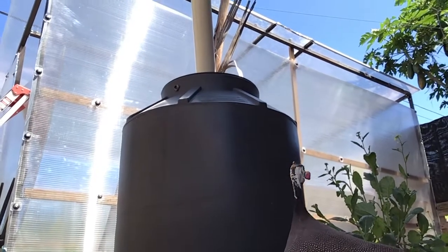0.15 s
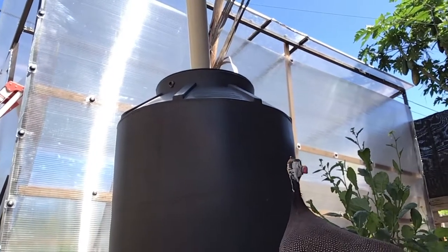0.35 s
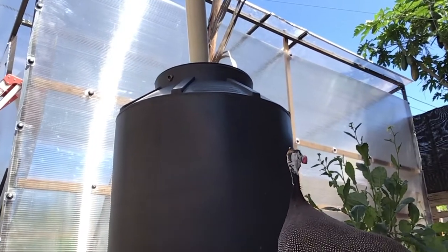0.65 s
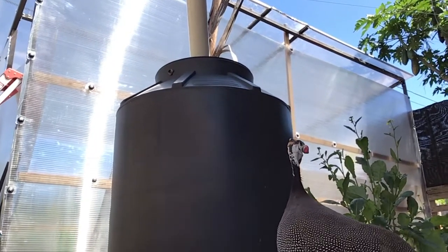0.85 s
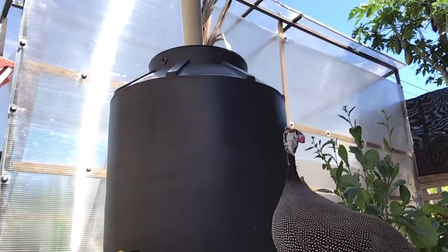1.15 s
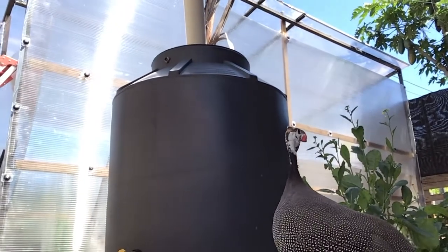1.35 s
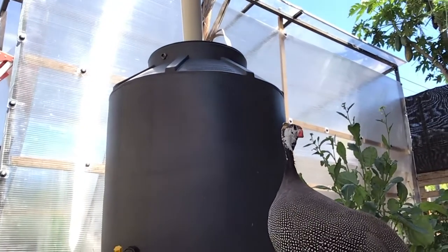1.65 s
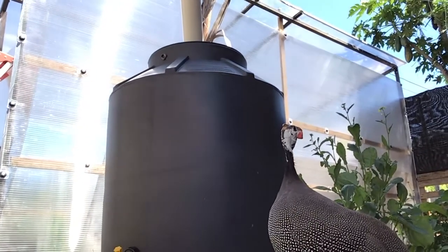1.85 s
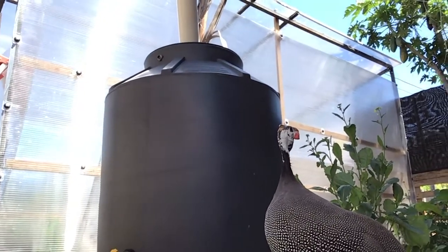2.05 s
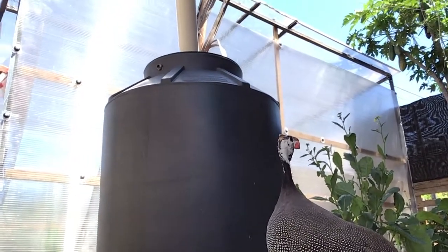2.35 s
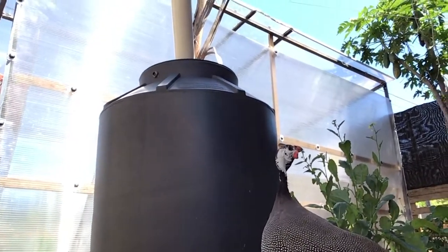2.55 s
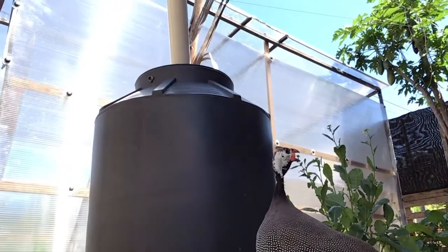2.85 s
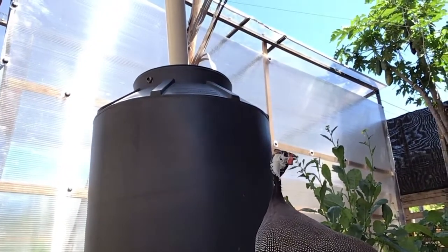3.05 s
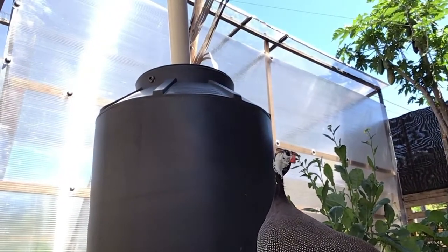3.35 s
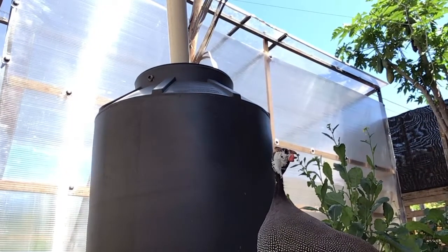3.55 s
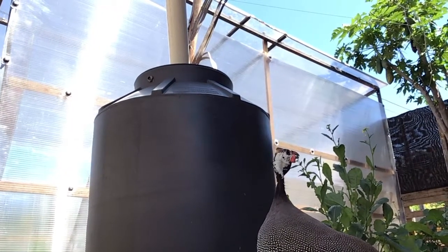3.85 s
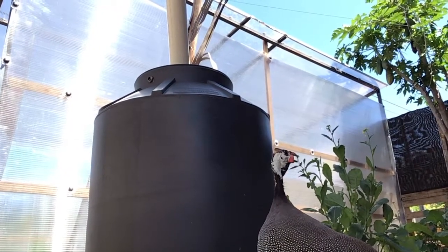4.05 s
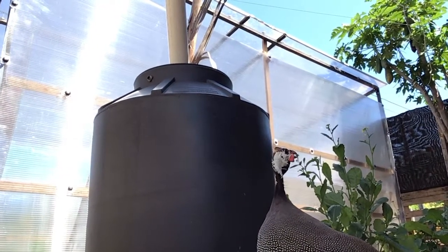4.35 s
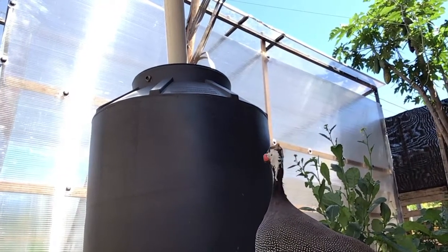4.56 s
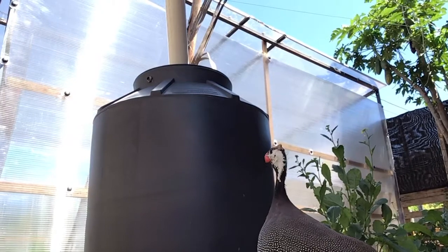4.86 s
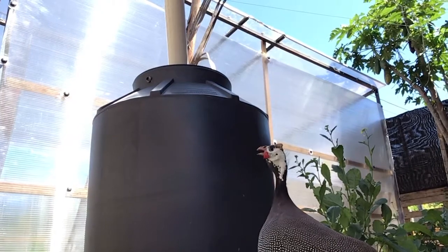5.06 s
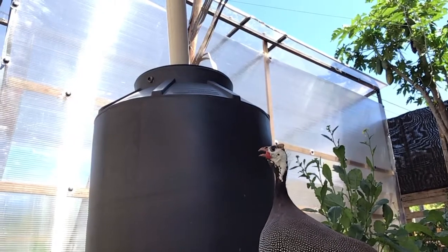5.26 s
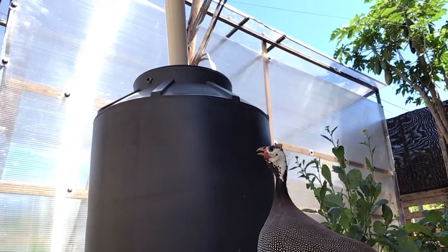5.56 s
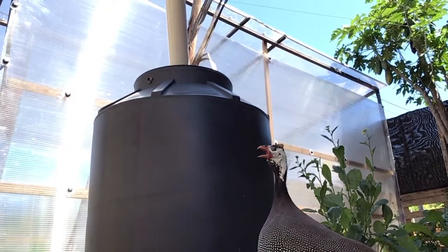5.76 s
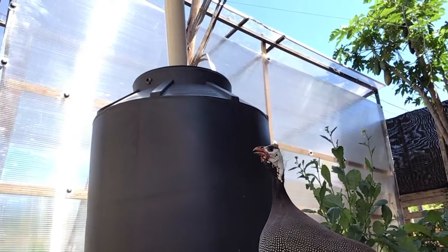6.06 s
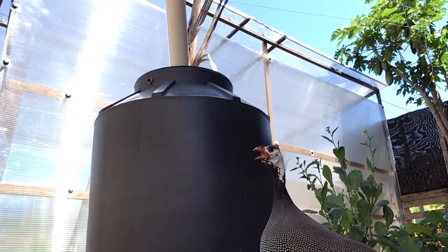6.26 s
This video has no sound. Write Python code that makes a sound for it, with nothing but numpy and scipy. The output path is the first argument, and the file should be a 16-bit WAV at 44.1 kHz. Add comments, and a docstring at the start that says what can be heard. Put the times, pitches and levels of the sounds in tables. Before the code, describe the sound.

Loud, raspy two-note guineafowl calls repeat steadily in a garden, with quieter distant replies and soft wind bumps.

```python
"""Guineafowl in a garden

A close guineafowl repeats a two-note call: a squeak, then a squawk that starts as a two-voiced whistle,
breaks into a rasp and settles into a reedy buzz (syrinx pulses ringing throat and beak). A second one
answers from farther off and one thin whistle slides down. Light wind bumps the microphone over steady
air, a faint distant hum and two dry ticks."""
import sys
import numpy as np
from scipy import signal
from scipy.fft import rfft, irfft, next_fast_len
from scipy.io import wavfile
from scipy.ndimage import uniform_filter1d

SR = 44100
rng = np.random.default_rng(int(sys.argv[2]) if len(sys.argv) > 2 else 0)


def wav_record(signal):
    """Record a signal, one row per channel, as 16-bit PCM in the file named by sys.argv[1]."""
    frames = np.transpose(np.atleast_2d(signal))
    bounded = np.clip(frames, -1, 1)
    # unit amplitude maps onto the largest positive 16-bit level
    quanta = np.round(bounded * 32767).astype(np.int16)
    wavfile.write(sys.argv[1], SR, quanta)


N = 283122
TIME_S = np.arange(N) / SR

# breeze, gust onsets, hum, ticks (time [s], level [dB])
BREEZE = [(0, -56), (1.4, -56), (1.9, -60), (2.8, -61.5), (3.3, -60), (6.4, -63)]
GUSTS = [(0.036, -41), (0.423, -45), (0.546, -33.5), (0.784, -34.5), (1.155, -43), (1.254, -36.5),
         (1.465, -35.5), (2.003, -42.5), (2.479, -43.5), (3.698, -49), (3.754, -49.5), (4.934, -52)]
HUM = [(0, -65), (.22, -55), (.45, -65.5), (1.7, -62), (2.3, -64.5), (2.6, -75.5), (6.4, -87)]
TICKS = [(.157, -69), (4.318, -58.5)]
# noise spectra (frequency [Hz], gain [dB])
WIND_SPECTRUM = [(15, -56.5), (25, -18.5), (54, 2.5), (134, 1), (277, -18.5), (357, -30), (448, -28.5),
                 (492, -43), (600, -30), (780, -66), (1320, -120)]
AIR_SPECTRUM = [(30, -16), (60, 4.5), (150, -2.5), (300, -2.5), (550, -16.5), (1500, -15.5), (3000, -23),
                (6000, -27.5), (15000, -35.5)]
TICK_SPECTRUM = [(3000, -27), (6500, 3), (10000, 0), (15000, -14)]
BEAK_HISS = [(9500, -24.5), (10600, -12.5), (11300, 0.5), (12100, 3.5), (12700, -17), (14500, -28)]
# far calls (high note start [s], high note level [dB], low note level [dB])
FAR_CALLS = [(-.11, -51, -70), (.43, -53.5, -58), (1.001, -56.5, -59), (1.536, -50, -59.5),
             (2.108, -52.5, -57.5), (2.649, -51.5, -60), (3.234, -52.5, -60), (3.809, -51, -60),
             (4.36, -52.5, -60.5), (4.92, -51.5, -59), (5.485, -52.5, -59.5), (6.01, -53, -60.5)]
# near squeaks (centre [s], half width [s], level [dB])
SQUEAKS = [(.256, 0.018, -39.5), (.85, 0.01404, -32), (1.475, 0.015, -29), (2.105, .016, -34),
           (2.71, .01, -34.5), (3.311, 0.0097, -30.5), (3.859, 0.011, -28.5), (4.409, 0.01531, -26.5),
           (4.995, .016, -31), (5.567, .019, -23.5), (6.129, .018, -21)]
# near squawks (start [s], whistle length [s], total length [s], pitch [Hz], whistle [dB], buzz [dB])
SQUAWKS = [(0.369, 0.042, 0.13, 1890, -21.5, -22), (.989, 0.023, .098, 1896, -15.5, -24.5),
           (1.623, .038, 0.091, 1888, -16, -25.5), (2.231, 0.046, 0.11, 1885, -18.5, -26),
           (2.829, 0.033, 0.12, 1881, -18, -28.5), (3.42, 0.039, 0.12, 1860, -17.5, -26.5),
           (3.959, .036, 0.12, 1886, -18.5, -26), (4.519, .05, .128, 1823, -19.5, -24),
           (5.112, 0.02, .119, 1872, -15, -22.5), (5.692, .032, 0.11, 1863, -15, -23),
           (6.229, .033, 0.13, 1848, -17, -23)]
# treble shading as the near bird turns its head (time [s], gain [dB])
FACING = [(.4, -2.5), (1.1, -5.5), (1.7, -7), (2.3, -6.5), (4.1, -6), (4.6, -1), (5.05, 2), (5.8, 1.5),
          (6.3, 2.5)]
# throat and open-beak resonances (frequency [Hz], gain [dB])
FAR_THROAT = [(600, -39.5), (900, -15.5), (1140, -3.5), (1350, -7), (1850, 7), (2300, -1.5), (3000, -5.5),
              (4000, -12.5), (5000, -11), (6200, -19), (8000, -24.5), (12000, -28.5), (15500, -36.5)]
RASP_THROAT = [(250, -39), (420, -30.5), (580, -33.5), (820, -30), (950, -24.5), (1170, -9), (1370, -12),
               (1650, -8.5), (1780, -5), (1910, 1), (2150, -15.5), (2370, -15.5), (3200, -27.5),
               (4500, -48.5)]
BUZZ_THROAT = [(250, -37.5), (390, -17.5), (560, -62.5), (780, -21), (930, -28.5), (1160, -12), (1520, -20),
               (1700, 5), (1930, 1.5), (2130, -10), (2340, -11), (2600, -15), (3200, -26), (4500, -66)]
RASP_BEAK = [(2000, -38), (3300, -10), (4400, -18.5), (4900, 5.5), (5500, -0.5), (6300, -7.5),
             (7200, -22.5), (9900, -27), (11400, -14.5), (12600, -22), (15500, -33.5)]
BUZZ_BEAK = [(2000, -50), (3400, -8.5), (4250, -0.5), (4600, -3), (5050, -5), (5900, -23), (7200, -18.5),
             (9900, -27.5), (11200, -17), (12600, -27.5), (15500, -30.5)]
# harmonics (multiple of pitch, gain [dB])
FAR_PARTIALS = [(1, -5.5), (2, -2), (3, -8.5), (4, -25), (5, -21), (6, -21.5), (7, -30)]
PEEP_PARTIALS = [(1, -6), (2, -2.5), (4, -13), (6, -27)]
WHISTLE_OVERTONES = [(2, -11), (3, -3), (4, -22.5), (5, -25), (6, -17.5), (7, -29.5)]
SLIDE_PARTIALS = [(1, -8.5), (2, -7.5), (3, 5.5)]
# second voice at 3/5 of the whistle's pitch, and combination tones (multiple of pitch/5, gain [dB])
TWO_VOICES = [(3, -18), (4, -32), (7, -27.5), (8, -34)]
TWO_VOICES_TREBLE = [(12, -35), (13, -30), (14, -28), (16, -31.5), (17, -37)]
# squeak envelope (offset from centre [half widths], gain [dB])
SQUEAK_SWELL = [(-2.4, -36), (-1.1, -15), (-.45, -2.5), (0, 0), (.45, -2.5), (1.1, -17), (2.4, -45)]
# onset envelopes (time from squawk start [s], gain [dB])
CREAK_SWELL = [(-.034, -30), (-.021, -2), (-.008, 0), (.004, -12)]
WHISTLE_ATTACK = [(-.025, -52.5), (-.012, -36), (-.003, -14.5), (.0026, -1.5), (.009, -0.5)]
SECOND_ATTACK = [(0, -28), (.008, -4), (0.017, -0.5)]
RASP_ATTACK = [(-.004, -34.5), (.008, -10)]
# crossfades (time from the whistle's break [s], gain [dB])
WHISTLE_HANDOVER = [(-.011, -1.5), (0, -7), (.014, -17), (0.036, -30)]
SECOND_HANDOVER = [(-.004, -3.5), (.022, -20.5)]
RASP_HANDOVER = [(-.012, -5.5), (0, -0.5)]
BUZZ_HANDOVER = [(-.01, -29), (.005, -13)]
# releases (time from squawk end [s], gain [dB])
RASP_RELEASE = [(-.048, -0.5), (-.02, -10.5), (0, -13), (.016, -34.5)]
BUZZ_RELEASE = [(-.044, -6), (-.026, 0), (-.012, 0), (0, -6), (.02, -30)]
# falling whistle (time [s], pitch [Hz], relative level [dB])
SLIDE = [(.5, 1440, -80), (.57, 1396, -62.5), (0.661, 1342, -66), (.73, 1247, -74), (0.791, 1070, -71.5),
         (.82, 1050, -82.5)]
# echoes off tank and greenhouse (delay [s], gain [dB])
ECHOES = [(.0052, -25), (0.0154, -21.5), (.027, -24), (.043, -23.5)]
# garden scatter (frequency [Hz], gain [dB])
SCATTER = [(300, -6.5), (1000, -3), (2000, -1.5), (4500, -1.5), (7000, -1), (15000, -8)]

GUST_TRIM_DB, AIR_DB, HUM_HZ = -6, -65, 179
FAR_LEAD_S, FAR_LOW_S, FAR_LOW_HZ, FAR_HIGH_S, FAR_HIGH_HZ = .127, .082, 1042, .162, 1116
PEEP_DB, CREAK_DB, CREAK_HZ = -61.5, -49, 4660
SQUEAK_HZ, SQUEAK_RASP_DB, HISS_DB = 1849.5, -39, -40.5
RASP_DB, RASP_BEAK_DB, BUZZ_BEAK_DB = -26.8, -33.5, -31
BUZZ_S, BUZZ_HZ, BUZZ_SAG = .044, 389, .02


def from_db(db):
    return 10 ** (np.asarray(db) / 20)


def unit_rms(x):
    return x / np.sqrt(np.mean(x ** 2) + 1e-20)


def line(points):
    """Linear curve through (time [s], value)."""
    s, value = np.transpose(points)
    return np.interp(TIME_S, np.maximum.accumulate(s), value)


def swell(points):
    """Gain through (time [s], level [dB]); zero outside."""
    s, db = np.transpose(points)
    during, gain = slice(*np.searchsorted(TIME_S, [s[0], s[-1]])), np.zeros(N)
    gain[during] = from_db(np.interp(TIME_S[during], np.maximum.accumulate(s), db))
    return gain


def around(time_s, shape):
    return [(time_s + offset_s, value) for offset_s, value in shape]


def coloured(x, spectrum):
    """Minimum-phase filter from (frequency [Hz], gain [dB]); peaks ring. Output rms 1."""
    size = 2 * next_fast_len(len(x) // 2 + 1)
    hz, db = np.transpose(spectrum)
    bins_hz = np.maximum(np.arange(size // 2 + 1) * SR / size, 1)
    outside_oct = np.abs(np.log2(bins_hz / np.clip(bins_hz, hz[0], hz[-1])))
    gain_db = np.interp(np.log(bins_hz), np.log(hz), db) - 20 * outside_oct
    cepstrum = irfft(np.log(from_db(gain_db)))
    cepstrum[0] = 0
    response = np.exp(2 * rfft(cepstrum[:size // 2], size))
    return unit_rms(irfft(rfft(x, size) * response)[:len(x)])


def noise(spectrum):
    return coloured(rng.standard_normal(N), spectrum)


def drift(rate_hz):
    """Smooth random curve, spread 1."""
    knots = signal.resample_poly(rng.standard_normal(5000), 8, 1)
    return np.interp(TIME_S * rate_hz * 8, np.arange(len(knots)), knots)


def partials(pitch_hz, table=((1, 0),)):
    """Sines on a moving pitch, from (multiple, level [dB])."""
    phase = 2 * np.pi * np.cumsum(pitch_hz) / SR
    return np.sqrt(2) * sum(from_db(db) * np.sin(round(k) * phase) for k, db in table)


def wind():
    """Breeze on the microphone; each gust hits fast, eases, drops away."""
    shape = [(0, -16), (.017, 0), (.068, -6), (.128, -24)]
    gusts = sum(from_db(db + GUST_TRIM_DB) * swell(around(s, shape)) for s, db in GUSTS)
    return np.hypot(from_db(line(BREEZE)), gusts) * noise(WIND_SPECTRUM)


def hum():
    """Distant wavering sine."""
    return from_db(line(HUM) + 1.5 * drift(5)) * partials(HUM_HZ * (1 + .006 * drift(2.1)))


def syrinx(pitch_hz, wobble, jitter, shimmer, breath):
    """One pulse a cycle, uneven in time and size; a turbulent puff at each opening."""
    cycles = np.cumsum(pitch_hz * (1 + wobble * drift(250))) / SR
    beats = np.arange(1, int(cycles[-1]))
    chance = rng.standard_normal((5000, 2))[:len(beats)]
    at = np.clip(np.interp(beats + jitter * chance[:, 0], cycles, np.arange(N)), 0, N - 2)
    whole, size = at.astype(int), np.exp(shimmer * chance[:, 1])
    pulses = np.bincount(whole, size * (1 - at + whole), N)
    pulses += np.bincount(whole + 1, size * (at - whole), N)
    puffs = rng.standard_normal(N) * (1 + np.cos(2 * np.pi * cycles)) ** 2
    return unit_rms(pulses) + breath * unit_rms(puffs)


def windpipe(x, feedback=.7):
    """All-pass reflections smear each pulse into the next."""
    for lag_samples in (23, 41, 67):
        taps = np.r_[-feedback, np.zeros(lag_samples - 1), 1]
        x = signal.lfilter(taps, taps[::-1], x)
    return x


def evened(x):
    """The air supply holds the level steady from cycle to cycle."""
    return x / np.sqrt(uniform_filter1d(x * x, size=260) + .05)


def far_notes():
    """Low note, then high (start [s], length [s], pitch [Hz], tone [dB], rasp [dB])."""
    for start_s, high_db, low_db in FAR_CALLS:
        yield start_s - FAR_LEAD_S, FAR_LOW_S, FAR_LOW_HZ, low_db, low_db - 2
        yield start_s, FAR_HIGH_S, FAR_HIGH_HZ, high_db, high_db + 5


def far_bird():
    """Each note: a grunt, a rising clear tone, then a rasp at a third of its pitch."""
    pitch, tone, rasp, grunt = [], 0, 0, 0
    for start_s, length_s, hz, tone_db, rasp_db in far_notes():
        pitch += around(start_s, [(0, .95 * hz), (.3 * length_s, .995 * hz), (length_s, 1.005 * hz)])
        tone_shape = [(0, -18), (.27 * length_s, 0), (.47 * length_s, -1),
                      (length_s, -8), (length_s + .017, -30)]
        rasp_shape = [(0, -16), (.43 * length_s, -9), (.5 * length_s, -2),
                      (length_s - .02, -2), (length_s + .011, -20)]
        tone += from_db(tone_db) * swell(around(start_s, tone_shape))
        rasp += from_db(rasp_db) * swell(around(start_s, rasp_shape))
        grunt += from_db(rasp_db) * swell(around(start_s, [(-.005, -25), (.0017, -4), (.045, -5)]))
    pulse_hz = line(pitch) / 3 * (1 + .016 * drift(25))
    rough = windpipe(syrinx(pulse_hz, wobble=.0081, jitter=.015, shimmer=.41, breath=.37))
    clear = partials(line(pitch) * (1 + .0042 * drift(40) + .0058 * drift(400)), FAR_PARTIALS)
    hoarse = evened(coloured(rough, FAR_THROAT)) * from_db(1.5 * drift(50))
    nasal = coloured(rough, [(1200, -22.5), (1620, 14.5), (1850, 3), (2200, -32)])
    return tone * from_db(2 * drift(65)) * clear + rasp * hoarse + grunt * nasal


def ticks():
    """Faint, dry bursts of treble noise."""
    return sum(swell([(s, db), (s + .014, db - 31)]) for s, db in TICKS) * noise(TICK_SPECTRUM)


def peeps():
    """As air starts to flow, a thin peep rises into each near note."""
    pitch, gain = [], 0
    for (mid_s, *_), (start_s, *_) in zip(SQUEAKS, SQUAWKS):
        pitch += around(mid_s, [(-.055, 1600), (-.025, 1750)])
        pitch += around(start_s, [(-.04, 1930), (-.008, 2030)])
        gain += swell(around(mid_s, [(-.055, -15), (-.04, 0), (-.028, 0), (-.018, -15)]))
        gain += swell(around(start_s, [(-.04, -18), (-.018, -2), (-.006, 0), (.002, -15)]))
    gain *= from_db(PEEP_DB + 3 * drift(30))
    return gain * partials(line(pitch) * (1 + .02 * drift(8) + .012 * drift(400)), PEEP_PARTIALS)


def whistle():
    """Each note drops into the throat resonance and blooms; squawks add a second voice, then break."""
    pitch, gain, unrest, second = [], 0, 0, 0
    for (mid_s, width_s, squeak_db), (start_s, held_s, _, hz, db, _) in zip(SQUEAKS, SQUAWKS):
        break_s = start_s + held_s
        for widths, ratio in [(-1.8, 1.06), (-.6, 1.008), (1, .98)]:
            pitch.append((mid_s + widths * width_s, ratio * SQUEAK_HZ))
        pitch += around(start_s, [(-.011, 1.06 * hz), (0, .998 * hz), (.00962, hz),
                                  (.028, 1.015 * hz), (held_s + .03, 1.02 * hz)])
        gain += from_db(squeak_db) * swell([(mid_s + k * width_s, fall) for k, fall in SQUEAK_SWELL])
        gain += from_db(db) * swell(around(start_s, WHISTLE_ATTACK) + around(break_s, WHISTLE_HANDOVER))
        second += from_db(db) * swell(around(start_s, SECOND_ATTACK) + around(break_s, SECOND_HANDOVER))
        unrest += swell([(start_s + .011, -30), (break_s - .008, -4), (break_s + .04, 0)])
    shade_db = .6 * line(FACING)
    pitch_hz = line(pitch) * (1 + .00284 * drift(300) + .01827 * unrest * drift(350))
    gain *= np.exp(.35 * unrest * drift(300))
    warble = 1 + .008 * drift(450) + .0099 * drift(70)
    overtones = from_db(-30.5 + 3 * drift(200)) * partials(pitch_hz * warble, WHISTLE_OVERTONES)
    hiss = from_db(HISS_DB + shade_db) * noise(BEAK_HISS)
    voices = sum(from_db(2.5 * drift(90)) * partials(pitch_hz / 5, [row]) for row in TWO_VOICES)
    for row in TWO_VOICES_TREBLE:
        voices += from_db(shade_db + 5.6 * drift(70)) * partials(pitch_hz / 5, [row])
    # overtones grow more slowly than the resonant fundamental
    return gain * partials(pitch_hz) + gain ** .68 * (overtones + hiss) + second * voices


def ragged(x, spread_db, rate_hz):
    """Narrow treble bands flare and fade independently."""
    centres_hz = np.geomspace(3300, 7000, num=8)
    size = next_fast_len(N, True)
    bins_hz, spectrum = np.arange(size // 2 + 1) * SR / size, rfft(x, size)
    masks = (np.interp(bins_hz, centres_hz, share) for share in np.eye(len(centres_hz)))
    bands = (irfft(spectrum * mask, size)[:N] for mask in masks)
    return evened(unit_rms(sum(band * from_db(spread_db * drift(rate_hz)) for band in bands)))


def rasp_and_buzz():
    """The syrinx drops to 1/5 of the whistle's pitch: chaotic, then periodic. Squeaks rasp faintly."""
    pitch, chaos, order, buzz, catch = [], 0, 0, 0, 0
    facing_db = line(FACING)
    for start_s, held_s, length_s, whistle_hz, _, buzz_db in SQUAWKS:
        break_s, end_s = start_s + held_s, start_s + length_s
        settle_s, low_hz = end_s - BUZZ_S, whistle_hz / 5
        pitch += [(start_s, low_hz), (break_s, 1.025 * low_hz)]
        pitch += around(settle_s, [(-.012, 1.035 * BUZZ_HZ), (.008, (1 + BUZZ_SAG) * BUZZ_HZ)])
        pitch += around(end_s, [(0, (1 - BUZZ_SAG) * BUZZ_HZ), (.01993, .95 * BUZZ_HZ)])
        chaos += swell(around(start_s, RASP_ATTACK) + around(break_s, RASP_HANDOVER)
                       + around(end_s, RASP_RELEASE))
        periodic = swell(around(break_s, BUZZ_HANDOVER) + around(end_s, BUZZ_RELEASE))
        order += periodic
        buzz += from_db(buzz_db) * periodic
    for mid_s, width_s, _ in SQUEAKS:
        catch += swell([(mid_s + k * width_s, db) for k, db in [(-1.7, -20), (0, 0), (.4, 0), (1.8, -22)]])
    catch *= from_db(SQUEAK_RASP_DB + 2 * facing_db)
    rasp = from_db(RASP_DB) * chaos + catch
    rasp_beak = from_db(RASP_BEAK_DB + facing_db) * chaos ** .88 + from_db(-11) * catch
    buzz_beak = from_db(BUZZ_BEAK_DB + .9 * facing_db) * order
    # the same pulses ring the throat and the brighter open beak
    rough = windpipe(syrinx(line(pitch), wobble=.017, jitter=.014, shimmer=.56, breath=.3))
    reedy = windpipe(syrinx(line(pitch), wobble=.003, jitter=.007, shimmer=.22, breath=.18))
    throat = rasp * evened(coloured(rough, RASP_THROAT)) + buzz * evened(coloured(reedy, BUZZ_THROAT))
    beak = rasp_beak * ragged(coloured(rough, RASP_BEAK), spread_db=3.5, rate_hz=50)
    beak += buzz_beak * ragged(coloured(reedy, BUZZ_BEAK), spread_db=4, rate_hz=30)
    return throat + beak


def creaks():
    """A high, unsteady tone opens each squawk."""
    gain = sum(swell(around(start_s, CREAK_SWELL)) for start_s, *_ in SQUAWKS)
    tone = partials(CREAK_HZ * (1 + .025 * drift(40) + .025 * drift(600)))
    return from_db(CREAK_DB + 1.6 * line(FACING) + 3.6 * drift(200)) * gain * tone


def falling_whistle():
    """A thin, breathy bird whistle slides down."""
    rows = np.array(SLIDE)
    pitch_hz = line(rows[:, :2]) * (1 + .02 * drift(700))
    return swell(rows[:, ::2]) * from_db(3.3 * drift(77) - 2.5) * partials(pitch_hz, SLIDE_PARTIALS)


def echoes(x):
    """Dull reflections off tank and greenhouse."""
    dull = signal.sosfilt(signal.butter(1, 5000, fs=SR, output="sos"), x)
    return sum(from_db(db) * np.interp(TIME_S - delay_s, TIME_S, dull, left=0) for delay_s, db in ECHOES)


def garden(x, wet_db, near_t60_s, tail_db, tail_t60_s):
    """Adds close scatter and a weaker, longer tail from trees and fences."""
    t = TIME_S[:SR]
    decay = from_db(-60 * t / near_t60_s) + from_db(tail_db - 60 * t / tail_t60_s)
    decay *= np.clip(t / .0043, 0, 1)
    response = from_db(wet_db) * coloured(rng.standard_normal(SR) * decay, SCATTER) / np.sqrt(SR)
    return x + signal.fftconvolve(x, response)[:N]


def scene():
    """Near bird with echoes, far birds wetter, background dry."""
    near = peeps() + creaks() + whistle() + rasp_and_buzz()
    near = garden(near + echoes(near), wet_db=-13.5, near_t60_s=.19, tail_db=-34.5, tail_t60_s=1.0)
    far = garden(far_bird() + falling_whistle(), wet_db=-7, near_t60_s=.29, tail_db=-20, tail_t60_s=.8)
    background = wind() + from_db(AIR_DB) * noise(AIR_SPECTRUM) + hum() + ticks()
    return (near + far + background)[None]


def record(dry):
    """Microphone band: 35 Hz to 15.7 kHz."""
    thin = signal.sosfilt(signal.butter(2, 35, "high", fs=SR, output="sos"), dry)
    return signal.sosfilt(signal.ellip(10, .1, 80, 15700, fs=SR, output="sos"), thin)


dry = scene()
out = record(dry)
wav_record(out)
```